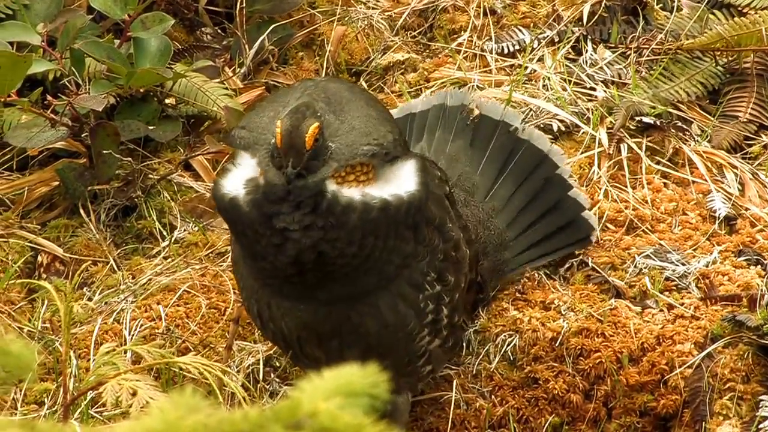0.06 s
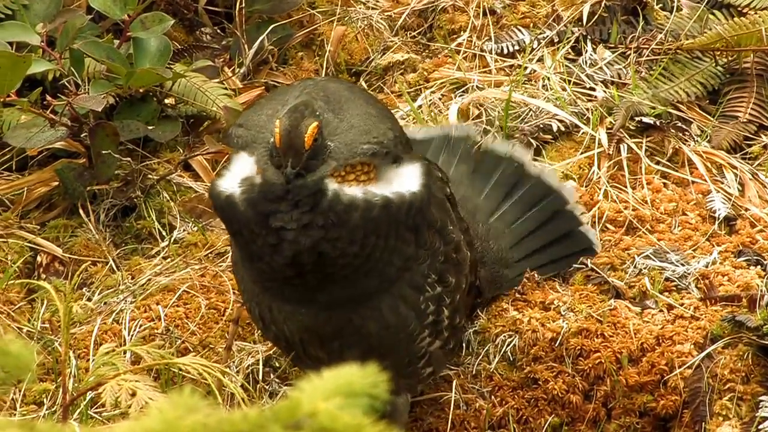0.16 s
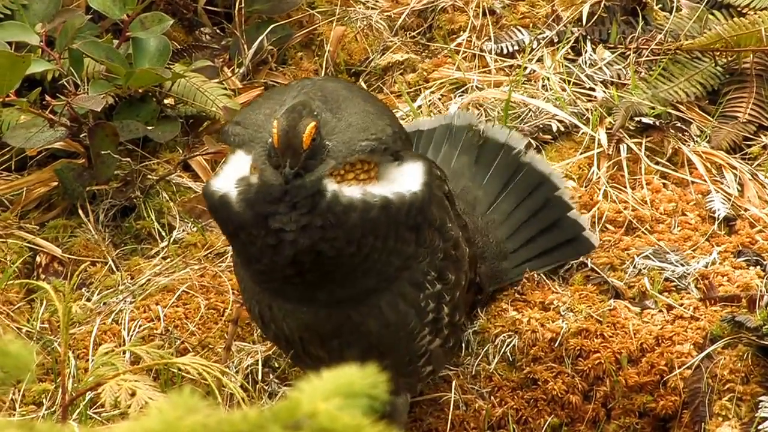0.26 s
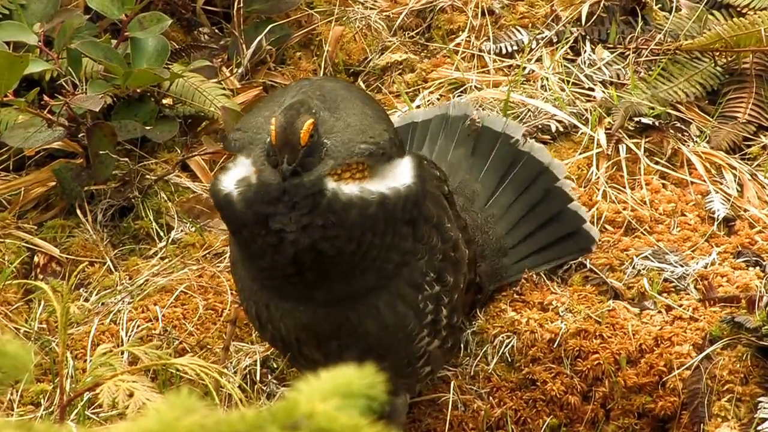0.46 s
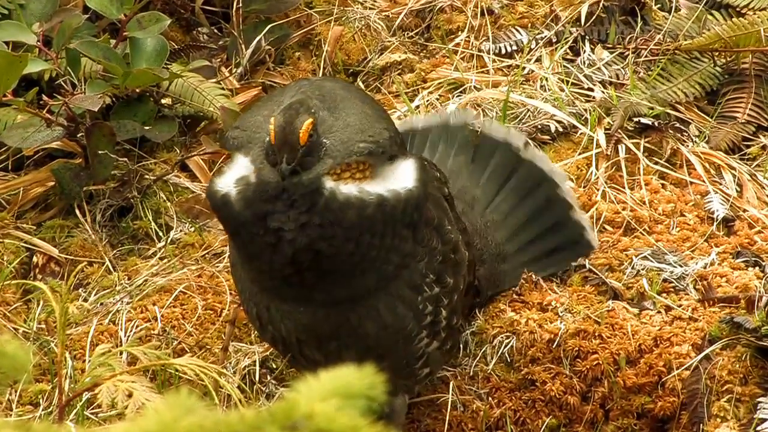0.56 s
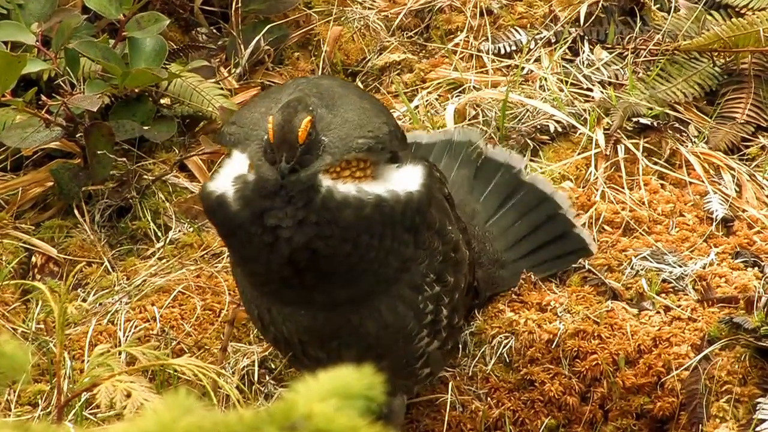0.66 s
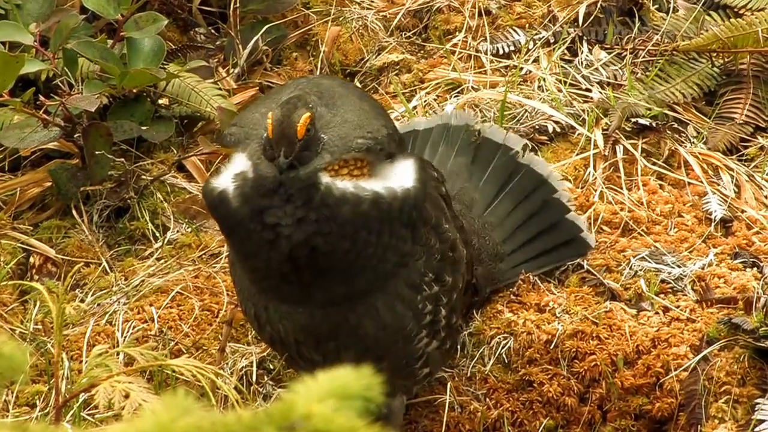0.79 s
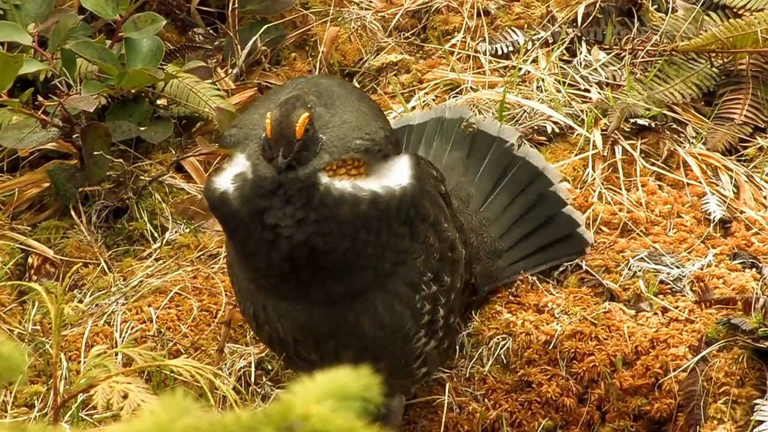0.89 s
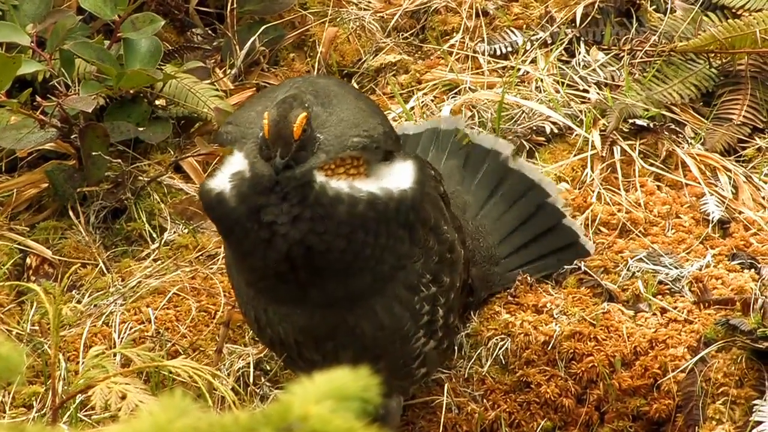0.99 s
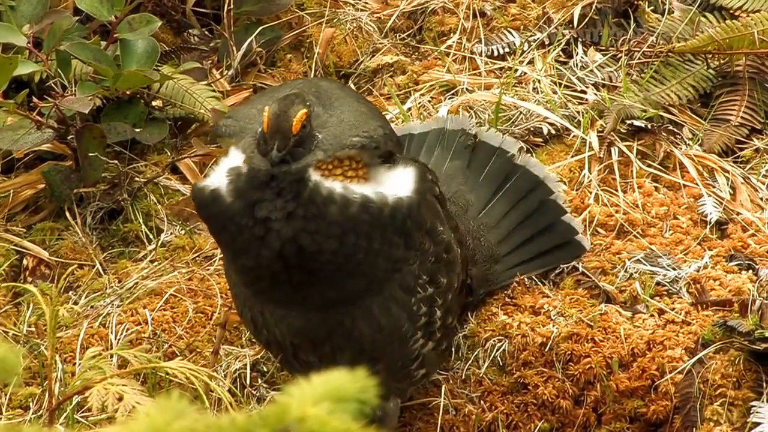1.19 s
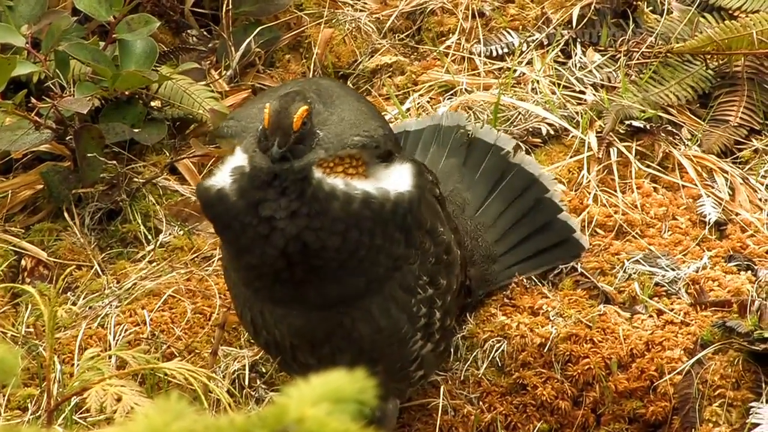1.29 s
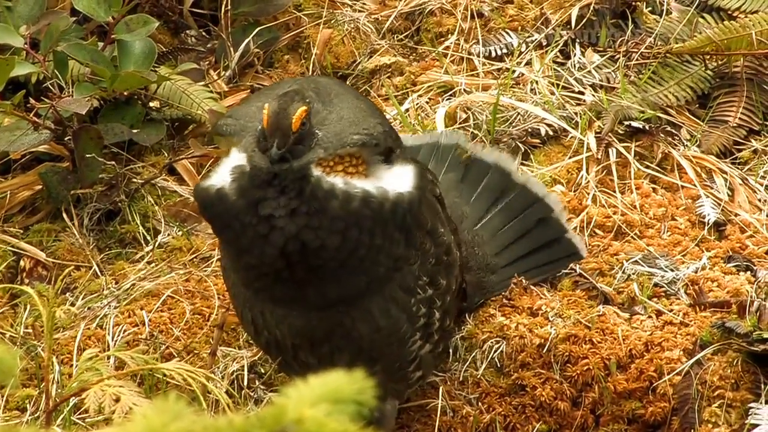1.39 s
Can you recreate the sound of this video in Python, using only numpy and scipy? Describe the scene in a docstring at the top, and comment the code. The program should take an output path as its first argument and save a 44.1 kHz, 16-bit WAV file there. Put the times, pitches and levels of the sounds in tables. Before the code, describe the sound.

Three short, low hoots come from a grouse near the microphone on open forest ground, the last slightly longer. Two faint, distant bird whistles sound near the start, and a soft hush with a thin whine lies underneath.

```python
"""A soft forest hush comes first, with a camera's own hiss and thin whine. A small bird whistles twice,
far off: one nearly level note, one falling. Just before the second whistle, a male grouse close by on
open ground gives the first of three hoots: soft, almost pure tones from his swollen throat.
The last hoot starts with a weaker swell. The forest sends back a faint echo."""
import sys
import numpy as np
from scipy import signal
from scipy.fft import rfft, irfft
from scipy.io import wavfile
from scipy.ndimage import uniform_filter1d

SR = 44100
rng = np.random.default_rng(int(sys.argv[2]) if len(sys.argv) > 2 else 0)


def transcribe(signal):
    """Save signal, clipped to [-1, 1], as a 16-bit WAV file at the path in sys.argv[1]."""
    frames = np.atleast_2d(signal).T
    limited = np.clip(frames, -1, 1)
    pcm = np.round(limited * 32767).astype(np.int16)
    wavfile.write(sys.argv[1], SR, pcm)


N = 63945
TIME = np.arange(N) / SR

# forest hush and microphone hiss, from bass to treble (f/Hz, relative level/dB)
HUSH_SPECTRUM = [(20, -22), (40, -10), (70, -5), (110, -15), (170, -1), (250, -2), (350, -7), (480, -5),
                 (620, -7), (900, -8.5), (1500, -12), (2200, -14), (3000, -20), (4500, -19), (7000, -23.5),
                 (9000, -26.5), (15500, -29.5)]
# how alike the hush is in the two ears (f/Hz, correlation: 1 means the same)
HUSH_LIKENESS = [(50, .6), (130, 1), (280, .7), (600, .28), (1300, .25), (2400, 0.32), (4400, -0.35),
                 (8000, .05), (15000, 0.18)]
# tones of the camera's hum and whine (f/Hz, level/dB)
WHINE_TONES = [(150, -74.5), (299.7, -72.5), (1198, -89.5), (1798, -87), (2997, -92.5), (5094.5, -94.5),
               (5394, -98), (5694, -93), (7192, -100), (10488, -100), (10788, -92.5)]
# path of the first, nearly level whistle (t/s, f/Hz, level/dB)
FIRST_WHISTLE = [(.062, 5350, -82.5), (.073, 5400, -74), (.092, 5610, -75.5), (.11, 5548, -70.5),
                 (.13, 5500, -74.5), (.143, 5650, -86)]
# path of the second, falling whistle (t/s, f/Hz, level/dB)
SECOND_WHISTLE = [(.279, 4944, -84), (.295, 4460, -76), (.306, 4260, -67.5), (.322, 4140, -72.5),
                  (.341, 3710, -82.5)]
# swells of the throat; the last two run into one hoot
# (start t/s, rise t/s, length until the fade t/s, fade speed/(dB per s), level/dB)
THROAT_SWELLS = [(.216, 0.033, 0.093, 705, -23.5), (0.652, 0.034, 0.097, 639.5, -24),
                 (1.023, 0.032, 0.069, 448, -30.5), (1.076, 0.047, 0.11, 542, -24.5)]
# faint higher tones of the hoot (multiple of the pitch, level/dB against the main tone)
HOOT_OVERTONES = [(2, -38), (3, -42), (4, -52), (5, -48.5)]
# air rushing into the throat sac (f/Hz, relative level/dB)
PUFF_SPECTRUM = [(30, -27.5), (120, -12), (215, 7.5), (300, -15.5), (500, -19), (1200, -51)]
# echoes from the forest (delay t/s, level/dB against the hoot)
FOREST_ECHOES = [(.108, -31.5), (0.214, -42)]


def gain_of(db):
    """Turns decibels into a number to multiply by."""
    return 10 ** (np.asarray(db) / 20)


def evened(x):
    """Scales a signal to an average size (rms) of 1."""
    return x / np.sqrt(np.mean(x ** 2) + 1e-20)


def look_up(points, hz):
    """Reads between a table's rows on a log-frequency axis."""
    f, value = np.transpose(points)
    return np.interp(np.log(hz + 1), np.log(f + 1), value)


def drift(rate_hz):
    """A random wobble of size about 1; a higher rate makes it quicker."""
    hz = np.fft.rfftfreq(2 * N, 1 / SR)
    return evened(irfft(rfft(rng.standard_normal(2 * N)) * np.exp(-(hz / rate_hz) ** 2)))[:N]


def delayed(x, s):
    """The same sound, s seconds later."""
    return np.interp(TIME - s, TIME, x, left=0)


def hush(level_db=-61, patch_db=0.89):
    """Forest hush and microphone hiss: wide, soft noise with gently drifting louder patches."""
    hz = np.fft.rfftfreq(1024, 1 / SR)
    a, b, c, d, patches = rng.standard_normal((N // 256 + 5, len(hz), 5)).T
    patches = uniform_filter1d(patches, size=10, axis=0)  # smooth across frequency
    patches = evened(uniform_filter1d(patches, size=14, axis=1))  # and across time
    alike = np.clip(look_up(HUSH_LIKENESS, hz), -1, 1)[:, None]
    left = a + 1j * b
    right = alike * left + np.sqrt(1 - alike ** 2) * (c + 1j * d)
    colour = gain_of(look_up(HUSH_SPECTRUM, hz)[:, None] + patch_db * patches)
    noise = signal.istft(np.array([left, right]) * colour, nperseg=1024, noverlap=768)[1][:, :N]
    return gain_of(level_db) * evened(noise)


def camera_whine(waver=0.22):
    """The camera hums and whines: thin, steady tones that waver a little in level."""
    tones = np.zeros(N)
    for hz, db in WHINE_TONES:
        level = gain_of(db) * (1 + waver * drift(rate_hz=5.5))
        tones += level * np.sin(2 * np.pi * (hz * TIME + rng.random()))
    return np.sqrt(2) * tones


def far_whistle(path):
    """A small bird far off sings one clean, gliding tone; the trees add an echo and a short tail."""
    times, hz, db = np.transpose(path)
    phase = 2 * np.pi * np.cumsum(np.interp(TIME, times, hz)) / SR
    singing = (TIME > times[0]) * (TIME < times[-1])
    level = uniform_filter1d(gain_of(np.interp(TIME, times, db)) * singing, size=200)
    tone = np.sqrt(2) * level * np.sin(phase)
    echo = gain_of(-10) * delayed(tone, s=0.1)
    return tone + echo + gain_of(-2.5) * tree_scatter(tone, fade_s=0.56, alike=0.17)


def tree_scatter(x, fade_s, alike, gap_s=0):
    """Many tiny echoes from the trees blur into a stereo tail that falls 60 dB in fade_s."""
    fade = gain_of(-60 * TIME / fade_s) * (TIME >= gap_s)
    a, b = rng.standard_normal((2, N)) * fade / np.linalg.norm(fade)
    mid, side = a * np.sqrt((1 + alike) / 2), b * np.sqrt((1 - alike) / 2)
    return signal.fftconvolve(x[None], np.array([mid + side, mid - side]), axes=1)[:, :N]


def throat_swell(start_s, rise_s, length_s, fade_db_per_s, level_db):
    """One push of air: a quick rise, a rounded top, a steady fade."""
    top_share, ease_s = 0.805, 0.0062  # how far along the top lies; how softly the fade begins
    age = np.maximum(TIME - start_s, 0)
    rise = np.sin(np.pi / 2 * np.minimum(age / rise_s, 1)) ** 2
    arch_db = 16.5 * (np.minimum(age / length_s, 1) - top_share) ** 2
    fade_db = fade_db_per_s * ease_s * np.logaddexp(0, (age - length_s) / ease_s)
    return rise * gain_of(level_db - arch_db - fade_db)


def throat_tone(push, top_hz=153.63, sag_hz_per_db=1.46, lowest_hz=133.7):
    """The swollen throat sounds an almost pure tone whose pitch sinks as the push weakens."""
    push_db = 20 * np.log10(push / push.max() + 1e-9)
    hz = np.maximum(top_hz + sag_hz_per_db * push_db, lowest_hz)
    phase = 2 * np.pi * np.cumsum(hz * (1 + 0.0045 * drift(rate_hz=69))) / SR
    overtones = sum(gain_of(db) * np.sin(multiple * phase) * (1 + 0.35 * drift(rate_hz=34))
                    for multiple, db in HOOT_OVERTONES)
    return np.sqrt(2) * push * (np.sin(phase) + overtones)


def air_puffs(push, length_s=0.072):
    """Air rushes into the throat sac each time a swell rises from near silence."""
    starts = [s for s, *_ in THROAT_SWELLS if push[round(s * SR)] < 0.1 * push.max()]
    progress = [np.clip((TIME - start) / length_s, 0, 1) for start in starts]
    bursts = sum(np.sin(np.pi * np.sqrt(share)) ** 2 for share in progress)
    colour = gain_of(look_up(PUFF_SPECTRUM, np.fft.rfftfreq(N, 1 / SR)))
    air = evened(irfft(rfft(rng.standard_normal(N)) * colour, N))
    return gain_of(-55) * air * bursts


def grouse():
    """Three hoots from slightly to the left; the forest adds echoes and a long, faint tail."""
    push = np.sqrt(sum(throat_swell(*row) ** 2 for row in THROAT_SWELLS))
    tone = throat_tone(push)
    echoes = sum(gain_of(db) * delayed(tone, s) for s, db in FOREST_ECHOES)
    hoots = tone + air_puffs(push) + echoes
    tail = gain_of(-34.5) * tree_scatter(tone, fade_s=2.3, alike=0.85, gap_s=0.03)
    lean = gain_of(0.49)  # the left ear hears him a little louder and sooner
    return np.array([hoots * lean, delayed(hoots, s=0.00006) / lean]) + tail


def scene():
    """Hush, whine and far whistles behind, the grouse in front."""
    return hush() + camera_whine() + far_whistle(FIRST_WHISTLE) + far_whistle(SECOND_WHISTLE) + grouse()


def record(dry, bass_cut_hz=35, treble_cut_hz=15720):
    """The microphone loses the deepest bass; then the highest treble is cut off."""
    thinned = signal.sosfilt(signal.butter(2, bass_cut_hz, "highpass", fs=SR, output="sos"), dry)
    treble_cut = signal.firwin(1023, treble_cut_hz, window=("kaiser", 10), fs=SR)
    return signal.oaconvolve(thinned, treble_cut[None], "same")


dry = scene()
out = record(dry)
transcribe(out)
```